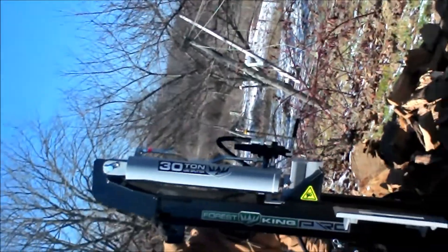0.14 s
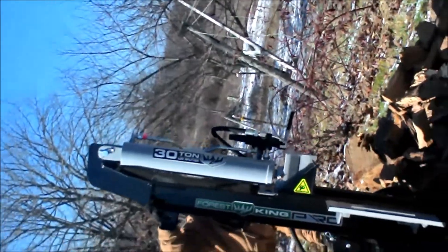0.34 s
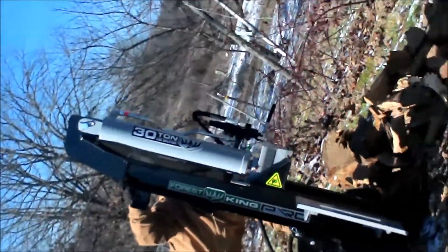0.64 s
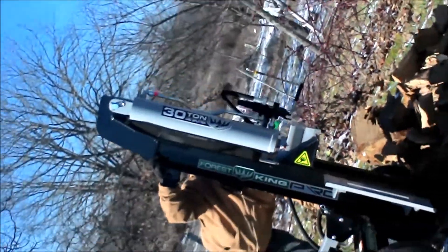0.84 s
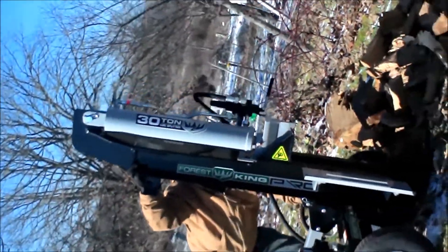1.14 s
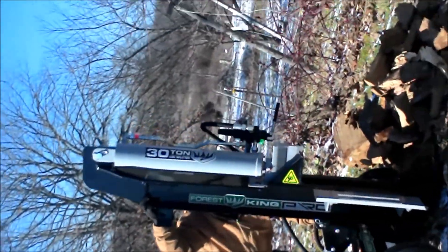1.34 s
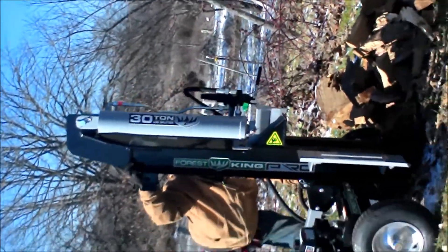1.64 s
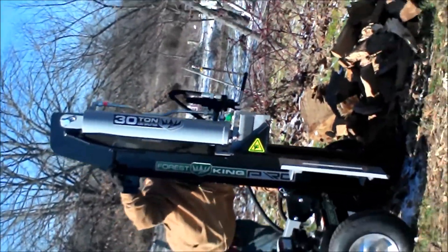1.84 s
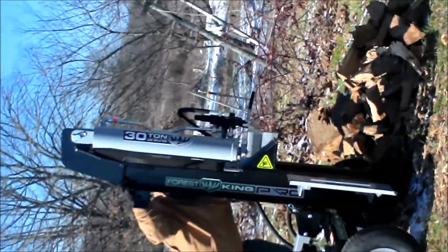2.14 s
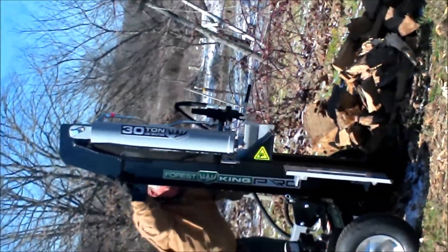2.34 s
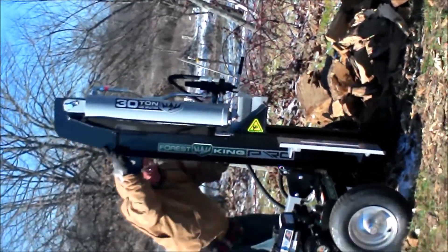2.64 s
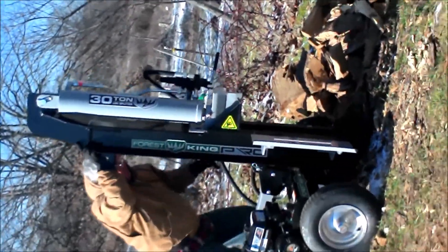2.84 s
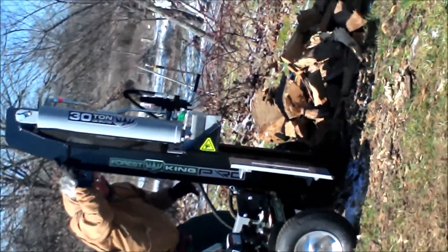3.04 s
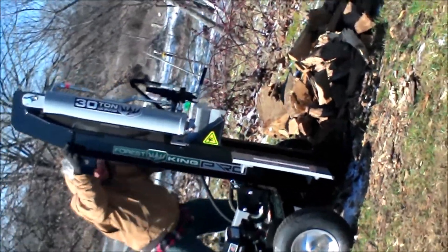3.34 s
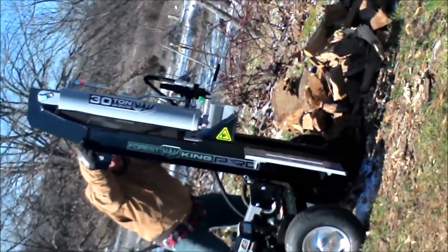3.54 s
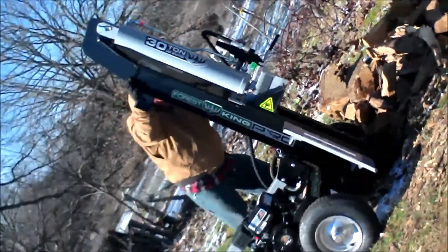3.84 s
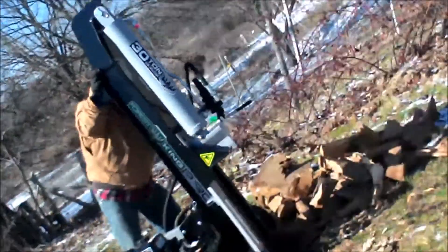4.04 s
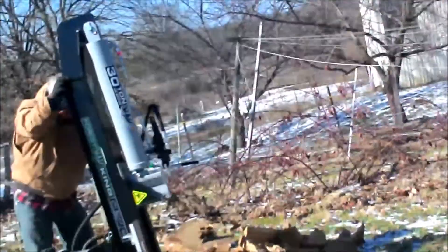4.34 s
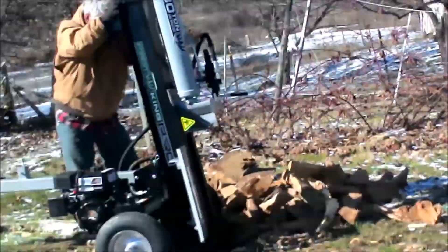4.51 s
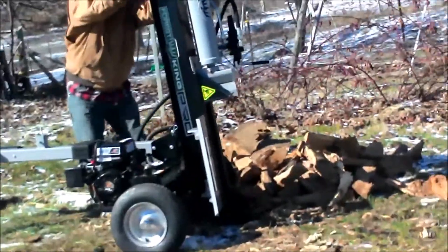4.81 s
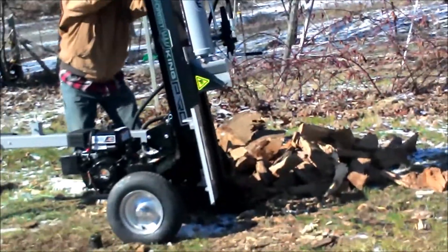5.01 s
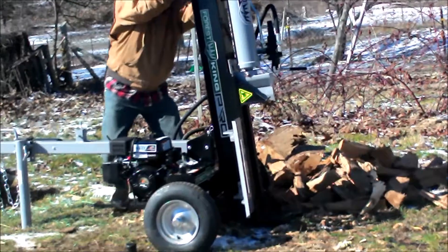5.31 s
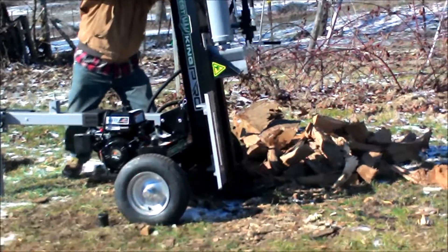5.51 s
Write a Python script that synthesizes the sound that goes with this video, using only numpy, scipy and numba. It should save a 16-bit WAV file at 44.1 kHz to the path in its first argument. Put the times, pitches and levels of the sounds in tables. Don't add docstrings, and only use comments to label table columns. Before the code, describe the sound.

Log splitter engine putters at a fast even beat, rattling and whining faintly, interrupted once by a loud bouncing steel latch slam in an open yard.

```python
import sys
import numpy as np
from scipy import signal
from scipy.fft import rfft, irfft
from scipy.io import wavfile
from numba import njit

SR = 44100
rng = np.random.default_rng(int(sys.argv[2]) if len(sys.argv) > 2 else 0)


def undo_db(level):
    steps = np.asarray(level, float) / 20
    return 10 ** steps


def store_pcm(level_fs):
    pcm = np.round(np.clip(level_fs, -1, 1) * 32767).astype(np.int16)
    wavfile.write(sys.argv[1], SR, np.atleast_2d(pcm).T)


N = 250047


def clock():
    return np.arange(N) / SR


def bump(s, half_s):
    return np.exp(-.5 * ((clock() - s) / half_s) ** 2)


def in_time(rows):
    s, *columns = np.transpose(rows)
    return [np.interp(clock(), s, column) for column in columns]


def rms_one(x):
    return x / np.sqrt(np.mean(x ** 2) + 1e-20)


def coloured(points):
    hz = np.maximum(np.fft.rfftfreq(N, 1 / SR), 1)
    point_hz, point_db = np.transpose(points)
    shape_db = np.interp(np.log(hz), np.log(point_hz), point_db)
    return rms_one(irfft(rfft(rng.standard_normal(N)) * undo_db(shape_db), N))


def drift(cut_hz):
    lowpass = signal.butter(2, cut_hz, fs=SR, output="sos")
    return rms_one(signal.sosfilt(lowpass, rng.standard_normal(N + SR))[SR:])


def resonate(x, hz, width_hz):
    r = np.exp(-np.pi * width_hz / SR)
    zeros = np.array([1, 0, -1]) * (1 - r * r) / 2
    poles = [1, -2 * r * np.cos(2 * np.pi * hz / SR), r * r]
    return signal.lfilter(zeros, poles, x + 1e-18)


@njit
def moving_resonance(x, turn, r):
    y = np.zeros(len(x))
    for i in range(2, len(x)):
        y[i] = (1 - r * r) / 2 * (x[i] - x[i - 2]) + 2 * r * np.cos(turn[i]) * y[i - 1] - r * r * y[i - 2]
    return y


def notch(x, hz, depth, width_hz):
    r = np.exp(-np.pi * width_hz / SR)
    return x - np.clip(depth, 0, 5 / 6) * moving_resonance(x, 2 * np.pi * hz / SR, r)


def clicks(times, sizes):
    at = np.round(np.ravel(times) * SR).astype(int)
    inside = (at >= 0) & (at < N)
    return np.bincount(at[inside], np.ravel(sizes)[inside], N)


# [start_s (centre), half_length_s, level_db]
GUSTS = [
    (0.497, .9, -64),
    (.6, 0.11, -66.5),
    (.95, 0.056, -56),
    (1.4, 0.034, -69),
    (1.823, .12, -69.5),
    (5.3, .6, -76),
]


def wind():
    band = signal.butter(2, [35, 110], "band", fs=SR, output="sos")
    rumble = signal.sosfilt(band, rng.standard_normal(N))
    calm_db = -80
    blowing = undo_db(calm_db) + sum(undo_db(level_db) * bump(s, half_s) for s, half_s, level_db in GUSTS)
    return blowing * undo_db(2.5 * drift(8)) * rms_one(rumble)


# [start_s, level_db, crack_t60_s]
BLOWS = [
    (1.9504, -17.5, 0.063),
    (1.951, -6.5, 0.045),
    (1.9529, -1.5, 0.023),
    (1.9599, -9, 0.032),
    (1.964, -13.5, .03),
    (1.9815, -13.5, .05),
    (1.9885, -18.5, 0.044),
    (2.003, -22, .06),
    (2.052, -24.5, 0.078),
    (2.061, -37.5, 0.43),
]
# [pitch_hz, level_db, t60_s]
STEEL = [(863.5, -14.5, 0.4), (1018, -19.5, .22), (1336, -24, .3), (1512, -14.5, 0.18), (1654, -23.5, 0.8),
         (1700, -28.5, 1.3), (1761, -6, 0.07), (2083, -18.5, 0.2), (2305, -9.5, 0.14), (2400, -12, 0.095),
         (2610, -17, 0.14), (3063, -22, .2), (3730, -11.5, .15), (3864, -2.5, 0.066), (4220, -13, 0.15),
         (4470, 4, 0.039), (5040, -2, 0.054), (4870, -5.5, 0.045), (5350, -1.5, .05), (5717, -18.5, 0.34),
         (6130, 3, 0.054), (6210, -13.5, 0.29), (6874, -12, 0.16), (7270, -18, 0.33), (8840, -19, 0.25),
         (9400, -18, .07), (9570, -17, .3), (10580, -14, .4), (11680, -18, 0.107), (11500, -17.5, .12),
         (560, -26, .06), (705, -28, 0.056), (3300, -10, .1), (6600, -3.5, .04), (13500, -27, .2),
         (14160, -23.5, .15), (15000, -29, .25)]
# [pitch_hz, level_db per Hz]
CRACK = [(180, -64), (300, -40.5), (1000, -13), (1350, -18), (2040, 0.5), (2250, -14.5), (2440, -1),
         (3180, -15.5), (3690, -9.5), (5050, 0), (7880, -6.5), (10400, -8.5), (15500, -42.5)]


def yard(x):
    t60_s, level_db, cut_hz = 0.27, -8.5, 1800
    length = SR // 2
    tail = rng.standard_normal(length) * undo_db(-60 * np.arange(length) / (SR * t60_s))
    tail = signal.sosfilt(signal.butter(1, cut_hz, fs=SR, output="sos"), tail)
    delayed = np.r_[np.zeros(600), tail / np.linalg.norm(tail)]
    return undo_db(level_db) * signal.fftconvolve(x, delayed)[:N]


def clank(ring_db, crack_db, rise_s):
    s, blow_db, crack_t60_s = np.transpose(BLOWS)
    start, length = round(s[0] * SR) - 200, SR
    t = np.arange(start, start + length) / SR
    age_s = np.clip(t - s[:, None], 0, 1)
    decay = undo_db(blow_db[:, None] - 60 * age_s / crack_t60_s[:, None])
    chatter = np.linalg.norm(decay * (1 - np.exp(-age_s / rise_s)), axis=0)
    out = np.zeros(N)
    for hz, mode_db, t60_s in STEEL:
        hits = undo_db(mode_db + ring_db) * chatter * rng.standard_normal(length)
        r, w = undo_db(-60 / (t60_s * SR)), 2 * np.pi * hz / SR
        rung = signal.lfilter([0, np.sin(w)], [1, -2 * r * np.cos(w), r * r], hits + 1e-18)
        out[start:start + length] += resonate(rung, hz, 640.0)
    out[start:start + length] += undo_db(crack_db) * chatter * coloured(CRACK)[:length]
    return out + yard(out)


# [firing_number, late_ms]
HUNT = [(0, 0), (3, .3), (12, -.5), (15, 1), (18, 3.9), (24, 3.7), (33, 6.8), (36, 5.3), (48, 9.7),
        (51, 9.3), (60, 5.9), (65, 7.7), (74, 4.4), (79, 6.2), (87, 3.6), (90, 3.2), (96, .1), (98, 0)]


def firings():
    first_s, cycle_s, count = -.0487, .058476, 98
    number = np.arange(count + 1)
    late_s = np.interp(number, *np.transpose(HUNT)) / 1000
    return np.round((first_s + cycle_s * number + late_s) * SR) / SR


# [swings_per_cycle, level_db]
WHINE = [
    (19, -70),
    (22, -83),
    (55, -64),
    (59, -65.5),
    (62, -57.5),
    (65, -78.5),
    (75, -75.5),
    (95, -70),
    (99, -78.5),
    (101, -63),
]


def whine(fired, waver_db, slip):
    turn = 2 * np.pi * np.interp(clock(), fired, np.arange(len(fired)))
    out = np.zeros(N)
    for order, level_db in WHINE:
        level = undo_db(level_db + waver_db * drift(5))
        phase = rng.uniform(0, 2 * np.pi) + slip * drift(6.4)
        out += level * np.sin(round(order) * turn + phase)
    return out


# [pitch_hz, level_db per Hz]
HISS = [(330, -33), (500, -20), (900, -12), (1700, -5.5), (2700, -3.5), (3600, -9), (5100, -6.5),
        (6500, -11), (7800, -18), (9000, -14.5), (10500, -23), (12500, -27), (14000, -26), (15600, -23)]
# [start_ms after firing peak, level_db]
HISS_CYCLE = [
    (-15.5, -1),
    (-7.5, -1.5),
    (2, 3.5),
    (6, -1.5),
    (21.5, 1.5),
    (27, -1),
    (36, -0.5),
    (39, -1.5),
    (38.5, 4),
    (39, 3),
]


def hiss(fired, grain_db):
    ms, level_db = np.transpose(HISS_CYCLE)
    times = np.ravel(fired[:, None] + ms / 1000)
    swell_db = np.interp(clock(), times, np.tile(level_db, len(fired)))
    return rms_one(undo_db(swell_db + grain_db * drift(250)) * coloured(HISS))


# [start_ms after firing peak, level_db]
CONTACTS = [(-10.5, -3), (-12, -9), (-5.5, 5.5), (-3.5, 6.5), (-3.5, -0.5), (1.12, 6.5), (3, -1), (7, -1),
            (12, 4), (16, 2.5), (17, -3.5), (25, -5.5), (26.5, -2.5), (30.5, -5), (31, -8.5), (33, 2),
            (37.5, -7.5), (37, -2), (43.5, 2.5), (42.5, -7)]
# [pitch_hz, width_hz, level_db]
CASING = [(361.7, 40, -25.5), (440.5, 60, -14), (536, 60, -12), (631, 25, -7.5), (834, 55, 0),
          (960, 21, -0.5), (1062, 27, -3), (1118, 25, -0.5), (1270, 110, 0.5), (1477, 76, -9),
          (1629.4, 40, 5.5), (1712, 49, -1), (2056, 130, -9.5), (2520, 160, -10), (2870, 72, -9.5),
          (3150, 92, -12), (3600, 69, -8), (4530, 260, -15), (5010, 64, -12), (5350, 69, -14.5),
          (5970, 69, -15), (6414, 330, -15), (7470, 120, -21), (9300, 340, -25.5), (10250, 150, -24.5)]
# [start_s (centre), half_length_s, low_modes_db, middle_modes_db]
CROSSINGS = [
    (3.0, .3, 1.6, -6),
    (3.5, .25, 3, -4.5),
    (4.35, .3, -3, 0.5),
]


def casing(fired, loose_db, loose_per_s):
    ms, level_db = np.transpose(CONTACTS)
    jitter_s = 4.5e-5 * rng.standard_normal((len(fired), len(ms)))
    times = fired[:, None] + ms / 1000 + jitter_s
    low_db = sum(low * bump(s, half_s) for s, half_s, low, _ in CROSSINGS)
    middle_db = sum(middle * bump(s, half_s) for s, half_s, _, middle in CROSSINGS)
    mid_swing_db = 5 * bump(4.35, 0.19)
    out = np.zeros(N)
    for hz, width_hz, mode_db in CASING:
        shade_db = 0
        if hz < 1000:
            shade_db = low_db
        elif 1400 < hz < 2600:
            shade_db = middle_db
        elif 2600 < hz < 3400:
            shade_db = mid_swing_db
        coupling = rng.choice([-1, 1], len(ms))
        sizes = coupling * undo_db(level_db + 2.1 * rng.standard_normal(times.shape))
        loose = (rng.random(N) < loose_per_s / SR) * rng.standard_normal(N) * undo_db(loose_db)
        rung = resonate(clicks(times, sizes) + loose, hz, width_hz)
        out += undo_db(mode_db + shade_db + 1.2 * drift(4.2)) * rung
    return rms_one(out)


# [start_ms after firing peak, pressure_share, pulse_cut_hz]
GAS_PULSES = [
    (-7.18, 1.14, 190),
    (-3.51, -7.81, 120),
    (-3.33, 6.04, 93),
    (2.11, 1.04, 155),
    (9.53, -.84, 106),
    (13.53, 1.68, 74),
    (14.79, -1.28, 256),
    (23.6, .13, 340),
]
# [pitch_hz, width_hz, level_db]
PORT = [
    (305, 90, 18.5),
    (450, 230, 8.5),
]


def exhaust(fired):
    strength = undo_db(.5 * rng.standard_normal(len(fired)))
    gas = np.zeros(N)
    for ms, share, cut_hz in GAS_PULSES:
        r = np.exp(-2 * np.pi * cut_hz / SR)
        pulse = signal.lfilter([1], [1, -2 * r, r * r], clicks(fired + ms / 1000, strength) + 1e-18)
        gas += share * pulse * (1 - r) * np.e
    thump = resonate(gas, hz=176, width_hz=46)
    snaps = clicks(fired - .0025, strength) + clicks(fired + .0135, 0.68 * strength)
    for hz, width_hz, port_db in PORT:
        thump = thump + undo_db(port_db) * resonate(resonate(snaps, hz, width_hz), hz, width_hz)
    tailpipe = -.33 * resonate(gas, hz=332, width_hz=171)
    return undo_db(-31.5) * (thump + tailpipe)


# [start_s, low_notch_hz, high_notch_hz, high_notch_depth 0-1]
PATH = [
    (0, 2920, 3580, .6),
    (.9, 3030, 4400, 0.45),
    (1.9, 3000, 4260, 0.38),
    (3.2, 3030, 4850, 0.5),
    (3.95, 3300, 4610, .41),
    (4.13, 3700, 4400, .5),
    (4.33, 3915, 4660, 0.82),
    (4.55, 3700, 4350, .6),
    (4.8, 3680, 4300, .6),
    (5.67, 3560, 4400, 0.25),
]


def reflected_paths(machine):
    low_hz, high_hz, high_depth = in_time(PATH)
    low_depth = 0.69 + .12 * (low_hz - PATH[0][1]) / 100
    shake = 1 + 0.013 * drift(11)
    machine = notch(machine, low_hz * shake, low_depth, width_hz=1200)
    return notch(machine, high_hz / shake, high_depth, width_hz=1100)


def ports(x, lag, diffuse_db, diffuse_hz, mono_hz):
    hz = np.fft.rfftfreq(N, 1 / SR)
    scatter = rng.standard_normal(300) * np.exp(-np.arange(300) / 78.0)
    scatter = scatter / np.linalg.norm(scatter)
    diffuse = undo_db(diffuse_db) * rfft(scatter, N) * hz / np.hypot(hz, diffuse_hz)
    turn = np.pi * hz / SR * lag
    side = (diffuse - 1j * np.sin(turn)) * hz / np.hypot(hz, mono_hz)
    return irfft(rfft(x) * np.array([np.cos(turn) + side, np.cos(turn) - side]), N)


def turned():
    turn_s, takes_s = 4.07, .06
    return .5 + .5 * np.tanh((clock() - turn_s) / takes_s)


def gain_db():
    start_db, duck_db, duck_s = -0.15, -8, 0.11
    sag_from_s, sag_db_per_s = 4.09, -1
    since_s = np.maximum(clock() - BLOWS[0][0], 0)
    ducked_db = duck_db * (1 - np.exp(-since_s / duck_s))
    return start_db + ducked_db + sag_db_per_s * np.maximum(clock() - sag_from_s, 0)


def scene():
    fired = firings()
    near = np.exp(-clock() / .45)
    casing_db = 3.5 * near + 2.5 * turned()
    hiss_db = 1 * near - 3 * turned()
    machine = undo_db(casing_db - 50.0) * casing(fired, loose_db=-5, loose_per_s=700.0)
    machine = machine + undo_db(casing_db) * whine(fired, waver_db=2, slip=.35)
    machine = machine + undo_db(hiss_db - 53.0) * hiss(fired, grain_db=-2.5)
    heard = exhaust(fired) + reflected_paths(machine)
    heard = heard + clank(ring_db=-34.5, crack_db=-2.5, rise_s=0.0012)
    stereo = ports(heard, lag=0.91, diffuse_db=-12.5, diffuse_hz=12000, mono_hz=650)
    return stereo + wind() / undo_db(gain_db())


def low_pass(x):
    return signal.sosfilt(signal.butter(12, 15830, fs=SR, output="sos"), x)


def record(dry):
    x = signal.sosfilt(signal.butter(2, 60, "high", fs=SR, output="sos"), dry)
    clear = np.maximum(bump(4.57, 0.4), 0.8 * turned())
    dip_depth = .83 * (1 - clear)
    x = np.array([notch(side, np.full(N, 8400.), dip_depth, width_hz=890) for side in x])
    slid = .5 + .5 * np.tanh((clock() - 3.8) / .25)
    top_hz = 13300 + (11300 - 13300) * slid
    x = np.array([notch(side, top_hz, .75, width_hz=1600) for side in x])
    x = 2 * np.tanh(x * undo_db(gain_db()) / 2)
    x = x + undo_db(-84.5) * signal.lfilter([1, -.9], [1], rng.standard_normal(x.shape))
    x = signal.sosfilt(signal.cheby2(10, 60, 16600, fs=SR, output="sos"), x)
    return low_pass(x)


dry = scene()
out = record(dry)
store_pcm(out)
```